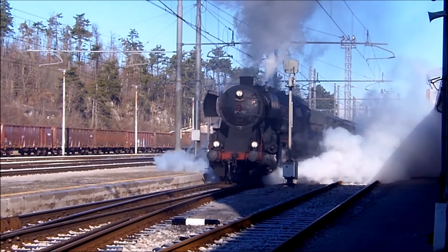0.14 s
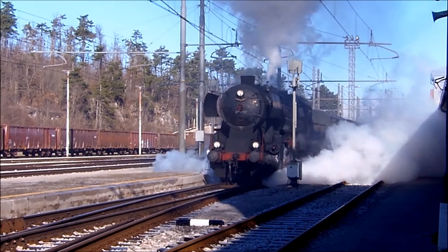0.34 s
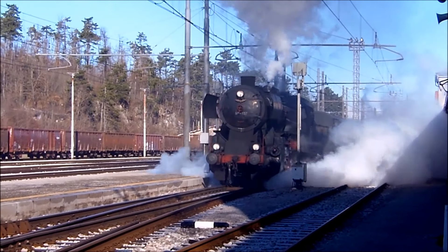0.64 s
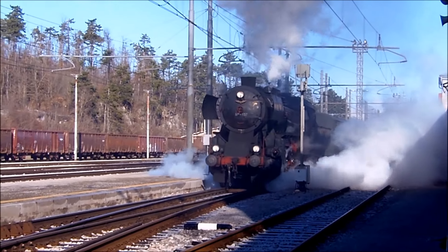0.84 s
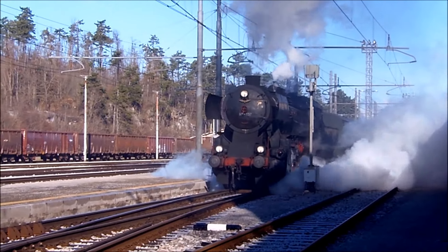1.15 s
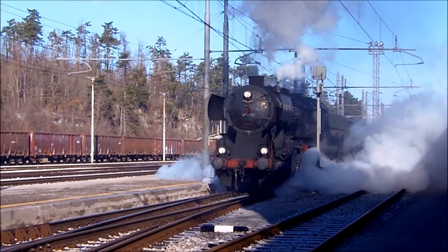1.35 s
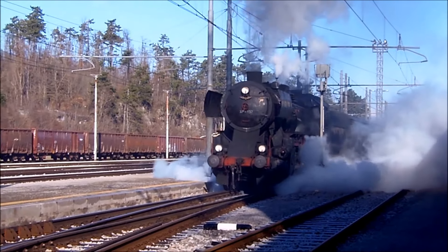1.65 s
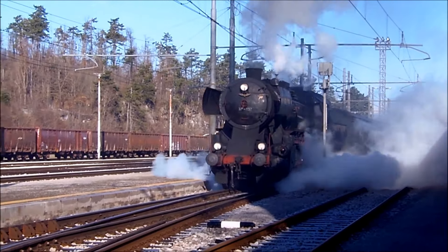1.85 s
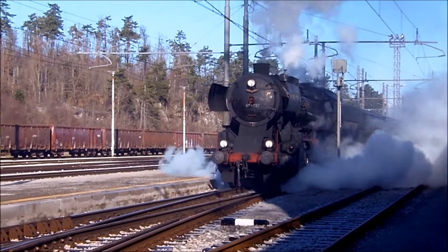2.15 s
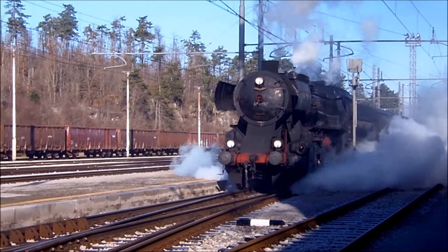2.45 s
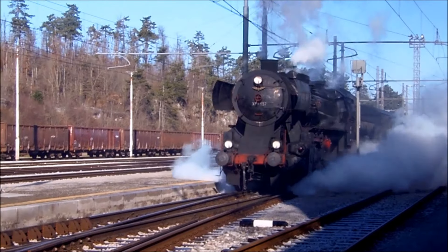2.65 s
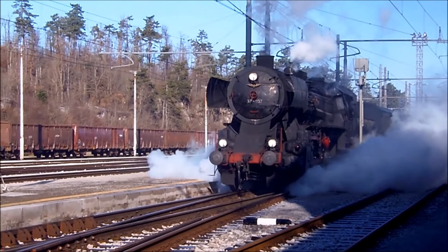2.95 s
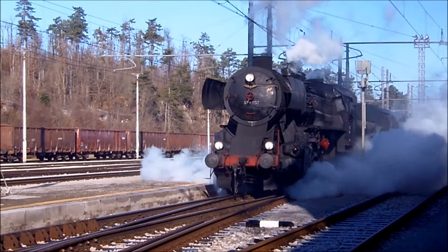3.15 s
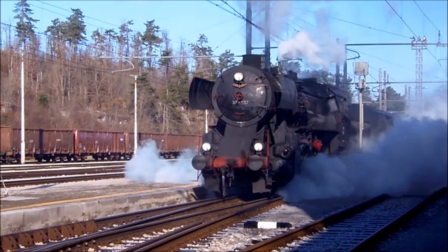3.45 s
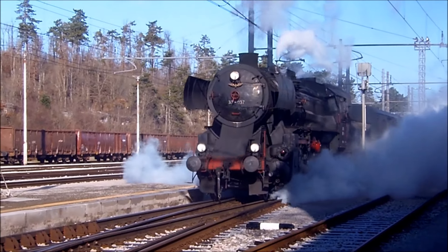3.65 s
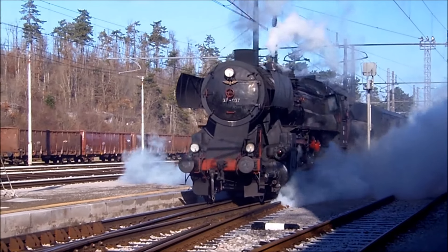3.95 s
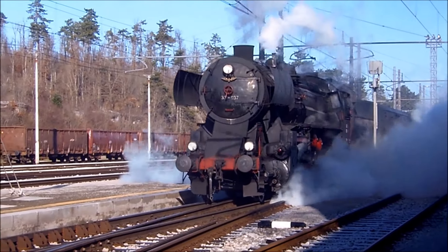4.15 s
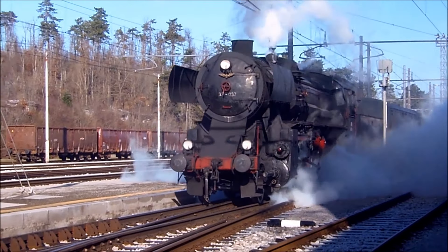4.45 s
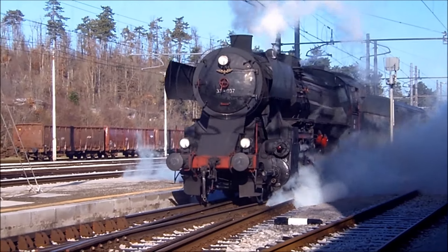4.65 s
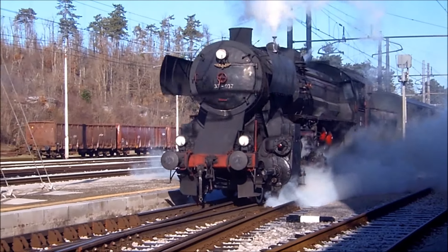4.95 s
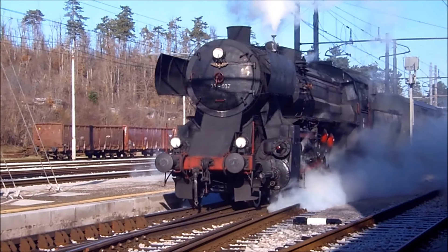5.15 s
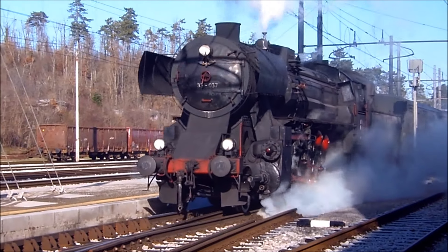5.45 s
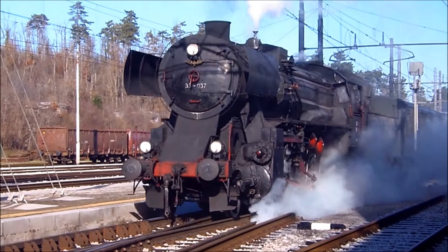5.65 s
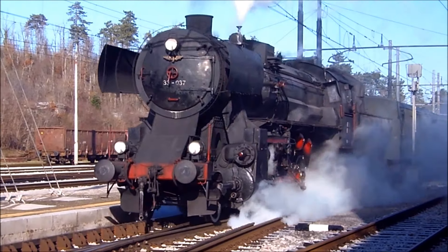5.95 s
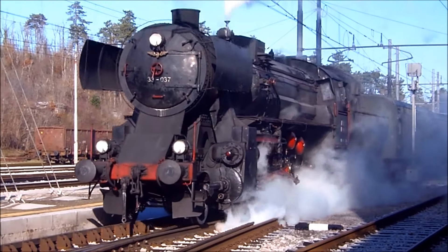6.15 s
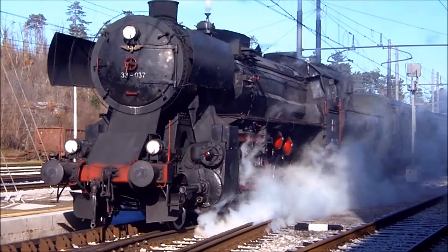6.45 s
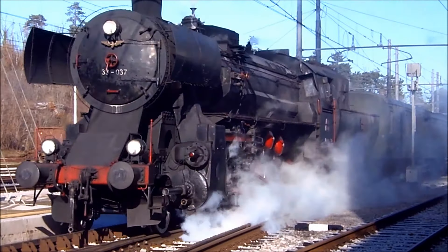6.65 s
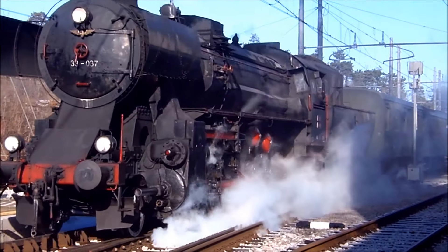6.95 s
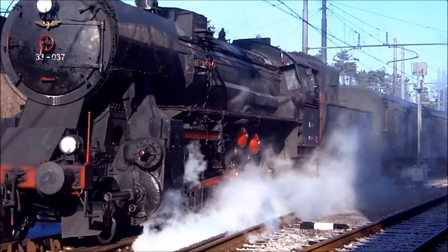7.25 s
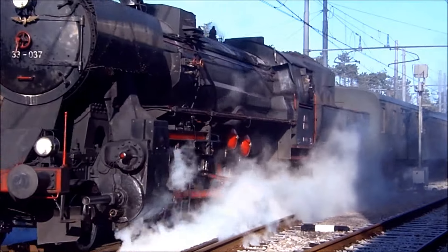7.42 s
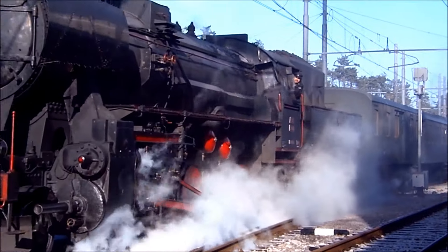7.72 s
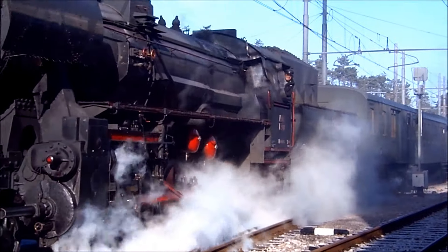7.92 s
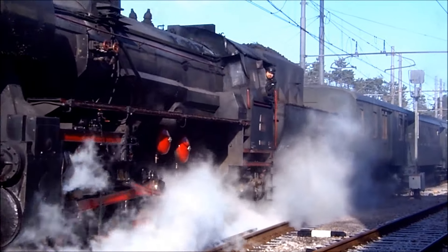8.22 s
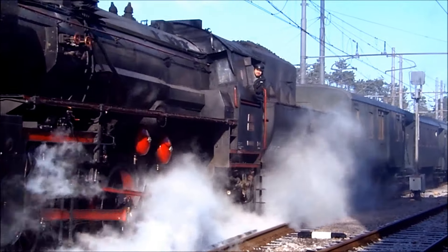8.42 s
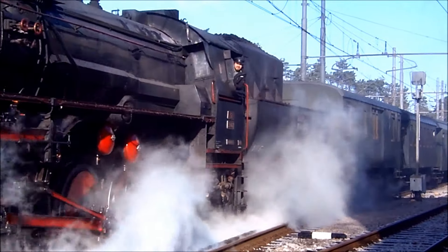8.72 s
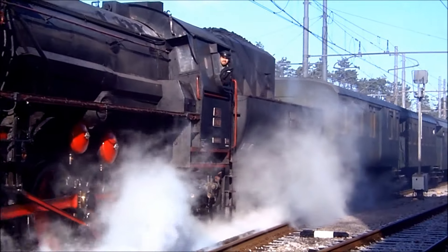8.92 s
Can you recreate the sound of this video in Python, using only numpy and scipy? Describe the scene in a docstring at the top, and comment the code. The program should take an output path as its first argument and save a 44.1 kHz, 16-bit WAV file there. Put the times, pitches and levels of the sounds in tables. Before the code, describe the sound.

Loud steam jets with faint, fuzzy singing pitches dominate first, with muffled uneven chuffs and train rumble beneath. Around three seconds the jets shut off abruptly. Deep, ragged chuffs then stand out in regular beats, slightly quickening, with airy onset, roar and pipe-like boom, over low rumble and dull clatter. A thin leak breathes about once every four beats. Mono, open-air pickup with short yard echoes, engine drawing close.

```python
"""A steam locomotive pulls away from a station towards one microphone, nears it and comes abreast.
At first open cylinder cocks hiss and sing over a rumbling train: shaped noise and resonant bands.
In each blast the nozzle hisses and air is pushed, then come a roar and the boom of the chimney pipe.
Once the cocks are shut at about three seconds, a leak that breathes once every four blasts is left."""
import sys
import numpy as np
from scipy import signal
from scipy.io import wavfile
from scipy.ndimage import uniform_filter1d

SR = 44100
rng = np.random.default_rng(int(sys.argv[2]) if len(sys.argv) > 2 else 0)


def unload_audio(sound):
    """Save the sound as a 16-bit wav file, at the path given as the first command line argument."""
    columns = np.transpose(np.atleast_2d(sound))
    # keep every value between -1 and 1, then stretch to whole-number steps
    steps = np.round(np.clip(columns, -1, 1) * 32767)
    wavfile.write(sys.argv[1], SR, steps.astype(np.int16))


N = 400428
T = np.arange(N) / SR

# exhaust blasts, four a wheel turn: start_s, length_s, boom_db, jet_db, nozzle_hiss_db
BLASTS = [(0.022, 0.094, -23.5, -39, -35), (0.261, 0.17, -27, -35.5, -53), (0.524, 0.14, -28.5, -40, -49),
          (0.787, 0.067, -21, -31, -38), (0.999, 0.052, -22.5, -37.5, -36.5),
          (1.178, 0.13, -29.5, -43, -56), (1.418, .05, -25.5, -54, -51), (1.643, 0.16, -26.5, -36, -38),
          (1.831, .13, -29, -38, -34.5), (2.035, .14, -34, -41, -55), (2.304, 0.14, -32.7, -41, -36.5),
          (2.603, .15, -29.5, -41, -37), (2.895, .09, -33.5, -45.5, -42),
          (3.149, 0.13, -28.5, -39.5, -47.5), (3.455, .12, -19.5, -28.5, -40),
          (3.746, 0.12, -15.5, -21, -32.5), (4.014, .1, -24.5, -28.5, -42.5),
          (4.272, .15, -21.5, -28.5, -36), (4.566, 0.1, -20, -31.5, -43.5),
          (4.845, 0.12, -18, -26.5, -36.5), (5.091, .1, -23, -31.5, -43), (5.341, 0.1, -22.5, -29.5, -37),
          (5.617, .13, -25, -35, -41.5), (5.888, 0.13, -18.5, -24, -33.5), (6.141, .12, -25.5, -32, -42.5),
          (6.379, 0.081, -30.5, -32, -38.5), (6.634, .14, -27.5, -29, -37), (6.896, .14, -21.5, -27, -34),
          (7.135, .15, -24.5, -33.5, -40), (7.366, 0.1, -28.5, -35.5, -39), (7.62, 0.14, -31, -34, -40),
          (7.877, .1, -19, -26, -31), (8.107, 0.14, -25.5, -36, -43), (8.324, 0.14, -27.5, -37, -38),
          (8.565, 0.15, -22.5, -35.5, -38), (8.818, 0.088, -18, -29.5, -29), (9.037, .12, -27, -41, -42)]
# parts of a blast of mean jet strength as the engine nears, the rush before its trim:
# time_s, push_db, thud_db, rush_db, boom_pitch_hz
APPROACH = [(0, -28, -44, -32, 179.6), (1.5, -25.5, -49, -36, 175), (3.1, -26, -54, -35, 171.4),
            (3.6, -24, -36, -33, 166.5), (5, -21, -33, -33, 174.4), (7, -19.5, -34, -31, 184.5),
            (7.9, -20, -31, -30, 195), (8.4, -23, -28.5, -29.5, 192.4), (9.08, -22, -32, -28, 197)]

# base times, which each part of a blast scales by its own shares
LEAD_S, RISE_S, FADE_S = 0.031, 0.029, 0.027
SNAP_S, SNAP_S_PER_DB = 0.019, 0.0012  # base rise of the early parts: weaker hisses rise slower
PUSH_SHARE, THUD_SHARE, RUSH_SHARE = 0.31, 0.57, 0.61  # how far each part follows the jet, dB per dB
MEAN_JET_DB, STRONG_HISS_DB = -30, -32  # levels from which those laws count


def gain_of(db):
    """Decibels to a factor."""
    return 10 ** (np.asarray(db) / 20)


def evened(x):
    """Scales to rms 1."""
    return x / np.sqrt(np.mean(x ** 2) + 1e-20)


def smoothed(x, first, second, axes=(-1, -1)):
    """Two running means, evened: slow or blurred chance."""
    once = uniform_filter1d(x, size=first, axis=axes[0])
    return evened(uniform_filter1d(once, size=second, axis=axes[1]))


def curve(table, column):
    """One dB column of a table as a gain for every sample."""
    rows = np.array(table)
    return gain_of(np.interp(T, rows[:, 0], rows[:, column]))


def noise(spectrum, patchy_db, flicker_db, streaky_db, size=512):
    """Random short-time spectra with patches, long thin streaks and a flicker common to all pitches; rms 1."""
    f, db = np.transpose(spectrum)
    frames = N // size + 2
    hz = np.fft.rfftfreq(size, 1 / SR)
    hz = hz[hz <= f[-1]]  # silent above the last point
    patches, streaks = rng.standard_normal((frames, len(hz), 2)).T
    patches = smoothed(patches, 8, 3, axes=(0, 1))  # axes: pitch, time
    streaks = smoothed(streaks, 2, 12, axes=(0, 1))
    shape_db = np.interp(np.log(hz + 1), np.log(f + 1), db)[:, None]
    field_db = shape_db + patchy_db * patches + streaky_db * streaks
    # four overlapping spectra to each step of the field
    flicker = evened(uniform_filter1d(rng.standard_normal(4 * frames), size=4))
    real, imaginary = rng.standard_normal((4 * frames, len(hz), 2)).T
    strength = np.repeat(gain_of(field_db), repeats=4, axis=1) * gain_of(flicker_db * flicker)
    z = np.zeros((size // 2 + 1, 4 * frames), complex)
    z[:len(hz)] = (real + 1j * imaginary) * strength
    return evened(signal.istft(z, nperseg=size, noverlap=3 * size // 4)[1][:N])


def resonate(x, hz, width):
    """Shifts the curve hz down to zero, smooths twice, and shifts back: a steep resonance."""
    turn = np.exp(2j * np.pi * np.cumsum(hz) / SR)
    r = np.exp(-np.pi * width / SR)
    return 2 * (turn * signal.lfilter([(1 - r) ** 2], [1, -2 * r, r ** 2], x / turn)).real


def blast_parts():
    """Every blast with the levels of all its parts: they follow the approach and, in part, the jet."""
    s, length, boom_db, jet_db, hiss_db = np.transpose(BLASTS)
    at, push_db, thud_db, rush_db, _ = np.transpose(APPROACH)
    over_db = jet_db - MEAN_JET_DB
    return {
        "start_s": s, "length_s": length, "boom": boom_db, "roar": jet_db, "hiss": hiss_db,
        "push": np.interp(s, at, push_db) + PUSH_SHARE * over_db,
        "thud": np.interp(s, at, thud_db) + THUD_SHARE * over_db,
        "rush": np.interp(s, at, rush_db) + RUSH_SHARE * over_db,
        "snap_s": SNAP_S + SNAP_S_PER_DB * np.clip(STRONG_HISS_DB - hiss_db, 0, 20)}


def blasts(part, early, rise_share, hold_share, fade_share, tail_db, tail_s):
    """Strength of one part of the blasts in time: rise, hold, fade, and an echo tail from the yard."""
    parts = blast_parts()
    power = np.zeros(N)
    for s, length, db, snap in zip(parts["start_s"], parts["length_s"], parts[part], parts["snap_s"]):
        rise = snap if early else RISE_S
        start = s - early * LEAD_S
        span = slice(max(round(start * SR), 0), round((start + 0.5) * SR))
        t = np.maximum(T[span] - start, 0)
        up = np.sin(np.pi / 2 * np.minimum(t / (rise_share * rise + 0.00054), 1)) ** 2
        late = np.maximum(t - hold_share * length - early * LEAD_S, 0)
        fade = 1 / np.cosh(late / (fade_share * FADE_S + 0.0011))
        tail = gain_of(tail_db) * np.exp(-late / tail_s)
        power[span] += (gain_of(db) * up * (fade + tail)) ** 2
    return np.sqrt(power)


def steam():
    """Jets of steam: a mid body, a high fizz, and two fuzzy singing bands while the cocks are open."""
    # steam from the open cocks: time_s, body_db, fizz_db, singing_db
    cocks = [(0, -26.5, -31.5, -38), (.33, -27, -26.5, -37), (.45, -26.5, -23.5, -34),
             (.6, -28, -26.5, -33.5), (1.06, -30, -29.5, -40), (1.45, -29, -27, -36),
             (1.72, -26, -24.5, -35.5), (1.9, -28.5, -29, -39), (2.15, -29, -24.5, -33.5),
             (2.35, -29, -23, -29), (2.6, -27, -24, -36), (2.8, -29.5, -25.5, -30),
             (3.01, -28.5, -25, -32.5), (3.11, -33.5, -31.5, -39), (3.22, -50, -52, -55)]
    # a leak at the near cylinder, about its loudest: time_s, body_db, fizz_db
    leak_levels = [(0, -43, -52), (3.7, -36, -43.5), (4.5, -40.5, -42), (5.6, -38, -41), (7.7, -38, -40),
                   (8.5, -35, -33.5), (9.08, -37, -38)]
    # singing bands of the open cocks: pitch_hz, drift_hz_per_s, width_hz, level_db
    singing = [(1977, -51, 210, -1), (2802, 43, 170, -2.5)]
    # spectrum of the mid body: pitch_hz, relative_db
    body_spectrum = [(300, -38), (800, -20), (1400, -7.5), (1900, 3), (2900, 2.5), (4000, -6.5),
                     (6000, -20.5), (9000, -48)]
    # spectrum of the high fizz: pitch_hz, relative_db
    fizz_spectrum = [(1500, -50), (3500, 2), (5500, -5), (9000, 0.5), (13000, -1), (16500, 4)]

    # the leak blows hardest at 0.57 of a wheel turn and dips by about 7 dB half a turn on
    turns = np.interp(T, np.transpose(BLASTS)[0], np.arange(len(BLASTS))) / 4
    squarish = np.tanh(1.7 * np.cos(2 * np.pi * (turns - 0.57)))
    breath = gain_of(-7 * (1 - squarish) / 2)
    body = np.hypot(curve(cocks, column=1), breath * curve(leak_levels, column=1))
    fizz = np.hypot(curve(cocks, column=2), breath * curve(leak_levels, column=2))
    out = body * noise(body_spectrum, 1.2, 0.9, 1.1) + fizz * noise(fizz_spectrum, 1.4, 1.0, 1.1)

    t = T[:round(cocks[-1][0] * SR)]
    level = curve(cocks, column=3)[:len(t)]
    for hz, drift, width, db in singing:
        band = evened(resonate(rng.standard_normal(len(t)), hz + drift * t, width))
        waver_db = 3 * smoothed(rng.standard_normal(len(t)), 4000, 3000)
        out[:len(t)] += level * gain_of(db + waver_db) * band
    return out


def rolling():
    """Wheels, rods and rails: a deep rumble and a dull clatter."""
    # rolling train: time_s, rumble_db, clatter_db
    levels = [(0, -42, -37), (1.4, -39, -41), (1.8, -32, -45), (2.2, -38, -37.5), (3.05, -45, -48.5),
              (3.6, -42, -32), (4.1, -30.5, -37), (5.5, -31.5, -37.5), (6.5, -34.5, -37.5),
              (7.8, -31.5, -39.5), (9.08, -32.5, -35.5)]
    # spectrum of the rumble: pitch_hz, relative_db
    rumble_spectrum = [(10, -39), (20, -4.5), (31, 1), (60, -5), (110, -15.5), (180, -17.5), (260, -30),
                       (500, -33.5)]
    # spectrum of the clatter: pitch_hz, relative_db
    clatter_spectrum = [(120, 1), (200, -6.5), (270, -22.5), (500, -12.5), (1100, -13), (1800, -6),
                        (4000, -55)]
    rumble = curve(levels, column=1) * noise(rumble_spectrum, 1.9, 2.3, 0.1, size=4096)
    clatter = curve(levels, column=2) * noise(clatter_spectrum, 1.9, 0.86, 1.7, size=1024)
    return rumble + clatter


def exhaust():
    """The nozzle hisses and spits first; rush, roar and thud of the mixing jet follow, the lower the later."""
    # spectra of nozzle hiss, spit, rush, roar and thud, each: pitch_hz, relative_db
    hiss_spectrum = [(2500, -3), (4500, -4), (7000, 0), (11000, 0.5), (16500, -1.5)]
    spit_spectrum = [(1500, -20), (2300, -2), (3000, -1.5), (3700, -5), (4600, -9), (7000, -25)]
    rush_spectrum = [(500, -12.5), (1200, -9), (1800, 3.5), (2400, -5), (3200, -14.5), (5000, -21)]
    roar_spectrum = [(250, -5.5), (420, -5.5), (700, -4.5), (1100, -7), (1600, -4), (2600, -8), (8000, -58)]
    thud_spectrum = [(150, -16), (230, 7.5), (300, -1), (420, -16), (700, -19)]

    hiss = blasts("hiss", early=0.93, rise_share=1.28, hold_share=0.22, fade_share=1.72,
                  tail_db=-3.0, tail_s=0.044)
    # the spit takes its level from the rush
    spit = blasts("rush", early=0.93, rise_share=0.97, hold_share=0.31, fade_share=1.57,
                  tail_db=-9.5, tail_s=0.043)
    rush = blasts("rush", early=1.0, rise_share=2.54, hold_share=0.5, fade_share=1.36,
                  tail_db=-24, tail_s=0.038)
    roar = blasts("roar", early=0, rise_share=1.14, hold_share=0.44, fade_share=1.32,
                  tail_db=-27.0, tail_s=0.069)
    thud = blasts("thud", early=0, rise_share=1.54, hold_share=0.39, fade_share=1.44,
                  tail_db=-41, tail_s=0.05)
    # eddies shed tens of times a second make the jet ragged
    eddies = gain_of(0.66 * smoothed(rng.standard_normal(N), 300, 200))
    high = hiss * noise(hiss_spectrum, 2.1, 0.54, 1.2, size=256)
    high += gain_of(-3.5) * spit * noise(spit_spectrum, 2.3, 1.0, 1.4)
    mixing = gain_of(-1.5) * rush * noise(rush_spectrum, 1.8, 0.9, 2.2)
    mixing += roar * noise(roar_spectrum, 1.8, 1.3, 2.2, size=1024)
    return high + eddies * mixing + thud * noise(thud_spectrum, 1.2, 1.1, 0.1, size=1024)


def push():
    """The slug of steam first draws then shoves the air once, and leaves lumpy low turbulence."""
    # spectrum of the turbulence: pitch_hz, relative_db
    slug_spectrum = [(10, -28), (20, -2), (31, -2), (45, -4.5), (75, -8), (110, -10.5), (180, -17),
                     (260, -35), (500, -44)]
    shove_db, shove_s = 4, 0.008  # peak of the swing above the push level, centre to peak
    out = noise(slug_spectrum, 1.85, 2.2, 0.13, size=2048)
    out *= blasts("push", early=0.56, rise_share=1.36, hold_share=0.61, fade_share=1.2,
                  tail_db=-31, tail_s=0.035)
    parts = blast_parts()
    for start, db in zip(parts["start_s"], parts["push"]):
        near = slice(max(round((start - 0.04) * SR), 0), round((start + 0.04) * SR))
        u = (T[near] - start) / shove_s
        out[near] += gain_of(db + shove_db) * u * np.exp(0.5 - u ** 2 / 2)
    return out


def boom_hz():
    """Pitch of the chimney: it climbs at the start of each blast as hot steam fills the pipe."""
    starts = np.transpose(BLASTS)[0]
    latest = np.maximum(np.searchsorted(starts, T, "right") - 1, 0)
    hz = np.interp(T, np.transpose(APPROACH)[0], np.transpose(APPROACH)[-1])
    return hz * (1 - 0.37 * np.exp(-abs(T - starts[latest]) / 0.015))


def chimney():
    """Turbulence rings the chimney pipe."""
    # resonances of the pipe: share_of_boom_pitch, width_hz, level_db
    resonances = [(.66, 49.3, -11), (.94, 35.2, 1), (1.15, 41.8, -2)]
    hz, drive = boom_hz(), rng.standard_normal(N)
    pipe = np.zeros(N)
    for k, (share, width, db) in enumerate(resonances):
        pipe += (-1) ** k * gain_of(db) * resonate(drive, hz * share, width)  # signs alternate
    return evened(pipe) * blasts("boom", early=0, rise_share=1.46, hold_share=0.53, fade_share=1.5,
                                 tail_db=-20.5, tail_s=0.078)


def scene():
    """All sources reach one microphone, copied to both channels."""
    return np.tile(steam() + rolling() + exhaust() + push() + chimney(), (2, 1))


def record(dry):
    """Colour of the housing for the bearing of the engine, a narrow notch filter, and the band limit."""
    # bearing of the engine: time_s, position (0 far ahead, 1 near, 2 and above abreast)
    bearings = [(0, 0.2), (2, 0.85), (4.5, 0.35), (6, 1.5), (7.5, 1.5), (9.08, 4)]
    # bumps and dips of the microphone housing: pitch_hz, width_hz, far_ahead_db, near_db, abreast_db
    housing = [(1780, 89, 0.5, -0.5, 1.5), (1870, 220, -1, 1.5, -3.5), (2556, 342, -4.5, -7, -12),
               (2790, 160, 2.5, 2, 8.5), (4160, 770, -3.5, -6.5, -4.5), (6230, 680, 7, 2.5, 7.5),
               (7250, 670, 4, 2.5, -2), (8720, 600, 4, 3, 0.5), (10420, 550, -3, -7, -3.5),
               (12040, 210, 6, 5.5, -4), (12500, 300, -2, -6, -2), (13150, 300, 1, 1, 6),
               (13900, 620, 4, -1, -3), (15100, 300, -9, -9, -3), (15500, 300, 1, -5, -8)]
    notch_hz, notch_width_hz, edge_hz = 7790, 330, 15790
    hz, t, z = signal.stft(dry[0], SR, nperseg=1024)
    bearing = np.interp(t, *np.transpose(bearings))
    colour_db = np.zeros(z.shape)
    for f, width, *db in housing:
        bump = np.exp(-((hz - f) / width) ** 2)
        colour_db += np.outer(bump, np.interp(bearing, np.arange(3), db))
    coloured = signal.istft(z * gain_of(colour_db), SR, nperseg=1024)[1][:N]
    notched = signal.lfilter(*signal.iirnotch(notch_hz, notch_hz / notch_width_hz, SR), coloured)
    low_pass = signal.firwin(1023, edge_hz, window=("kaiser", 10), fs=SR)
    return np.tile(signal.oaconvolve(notched, low_pass, "same"), (2, 1))


dry = scene()
out = record(dry)
unload_audio(out)
```